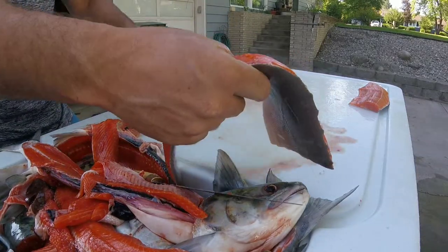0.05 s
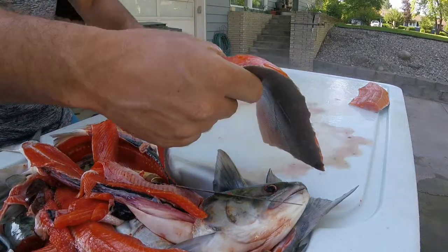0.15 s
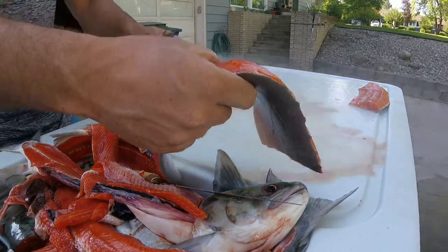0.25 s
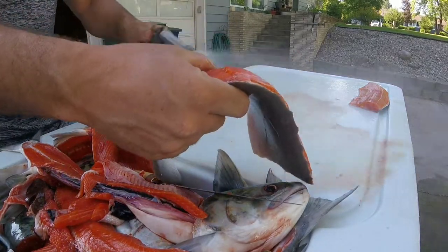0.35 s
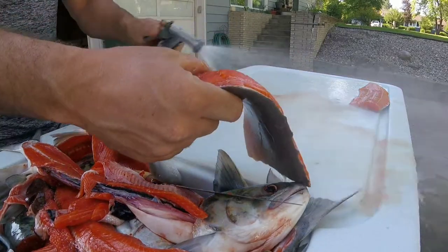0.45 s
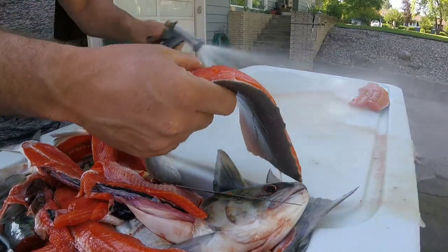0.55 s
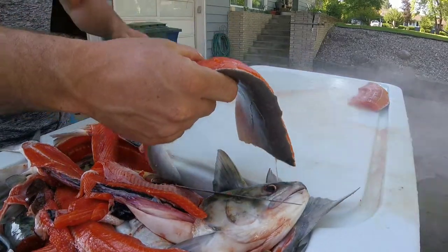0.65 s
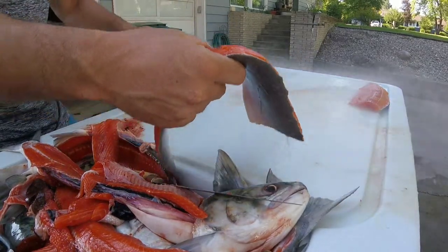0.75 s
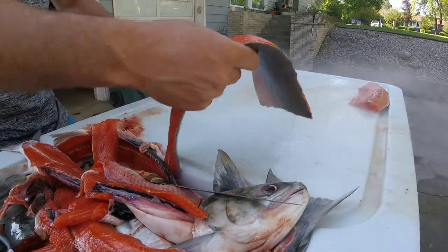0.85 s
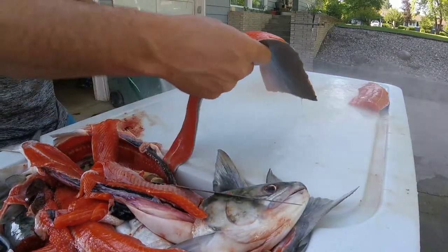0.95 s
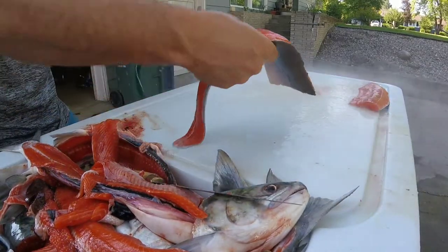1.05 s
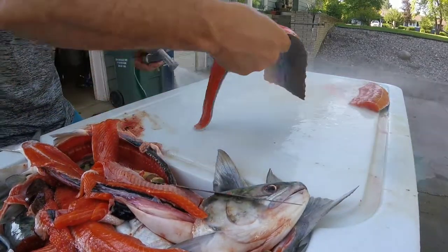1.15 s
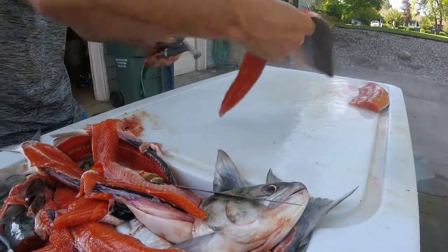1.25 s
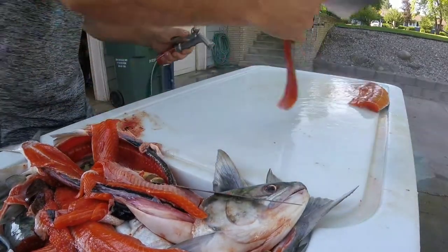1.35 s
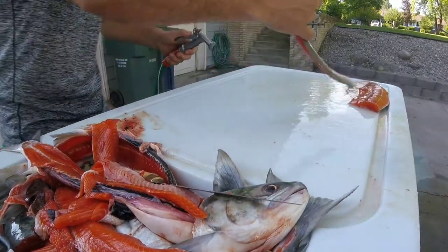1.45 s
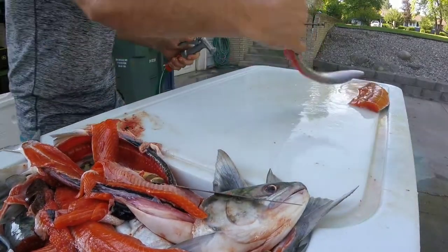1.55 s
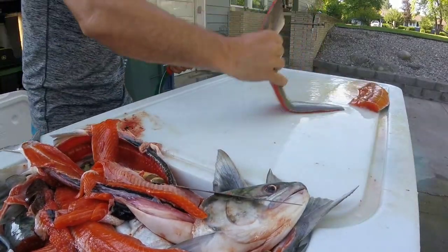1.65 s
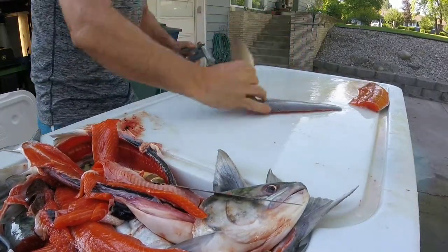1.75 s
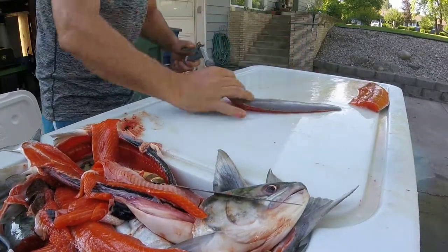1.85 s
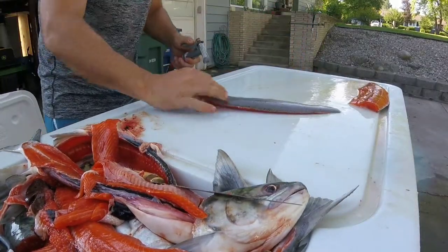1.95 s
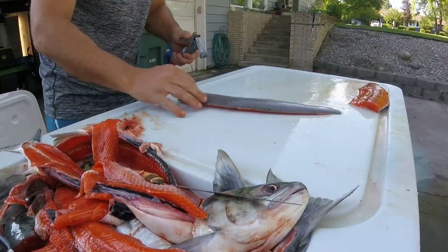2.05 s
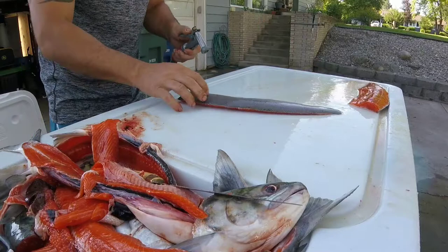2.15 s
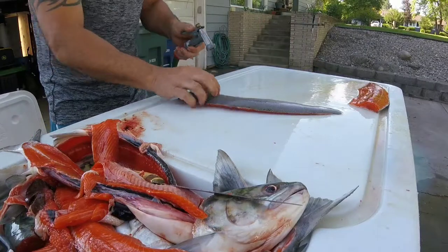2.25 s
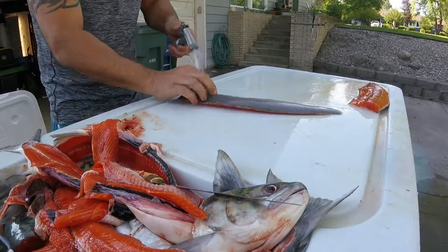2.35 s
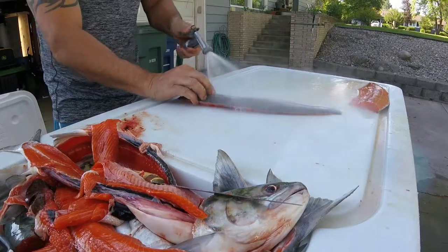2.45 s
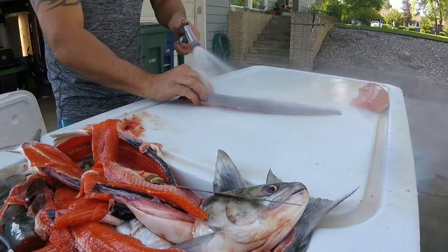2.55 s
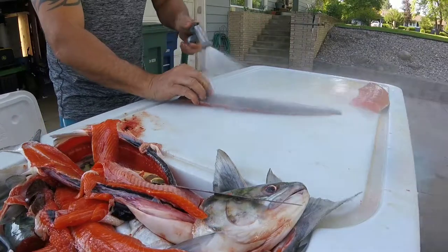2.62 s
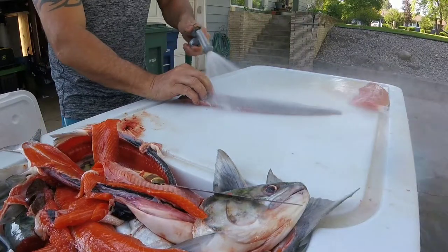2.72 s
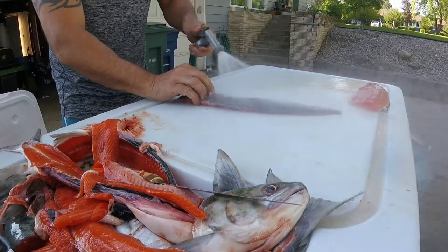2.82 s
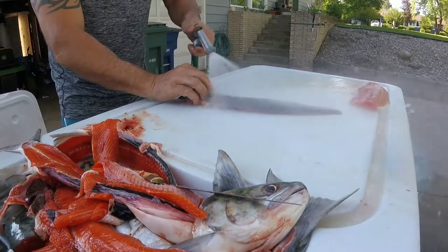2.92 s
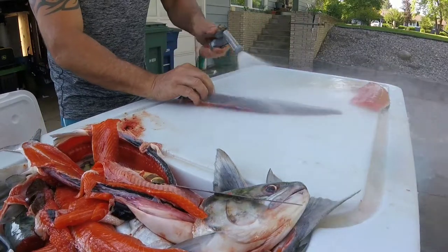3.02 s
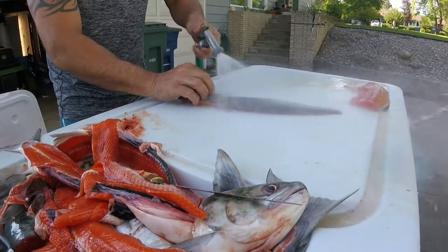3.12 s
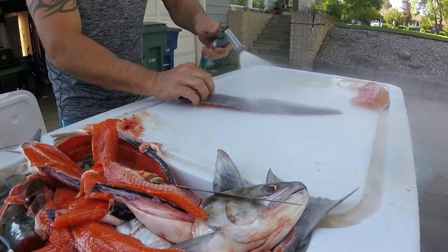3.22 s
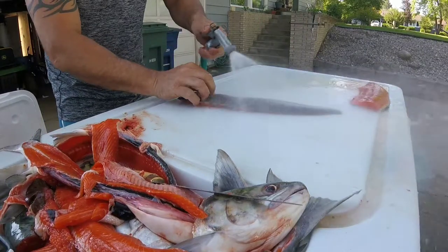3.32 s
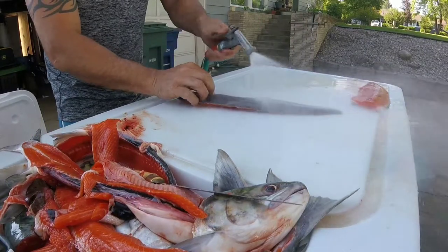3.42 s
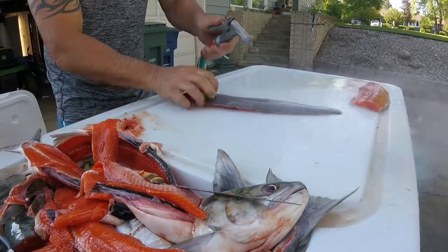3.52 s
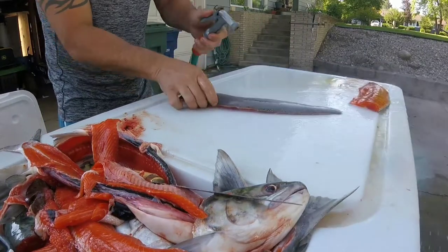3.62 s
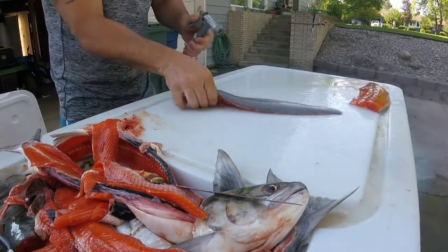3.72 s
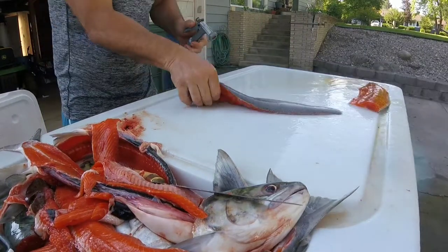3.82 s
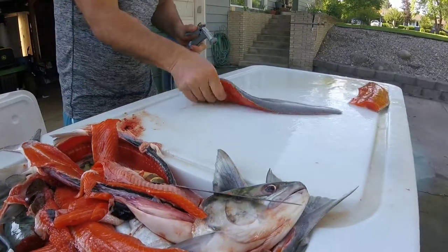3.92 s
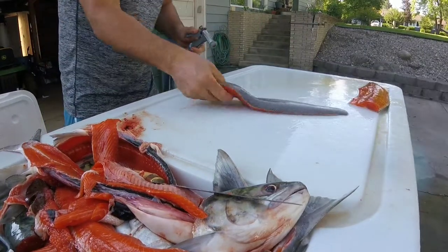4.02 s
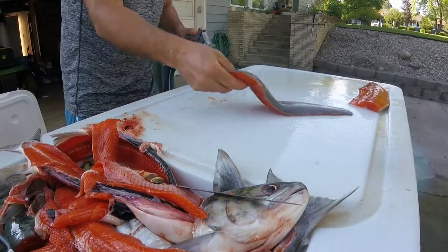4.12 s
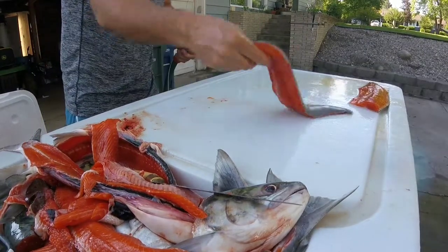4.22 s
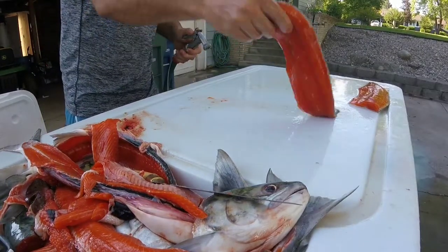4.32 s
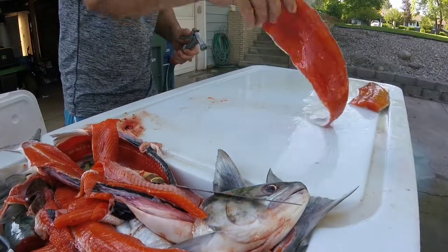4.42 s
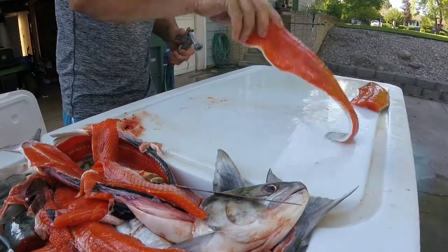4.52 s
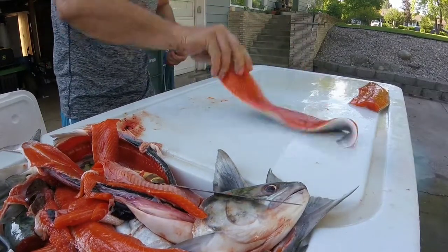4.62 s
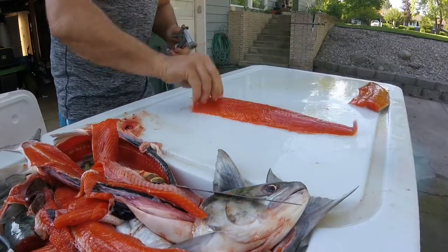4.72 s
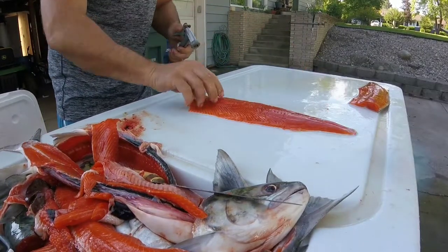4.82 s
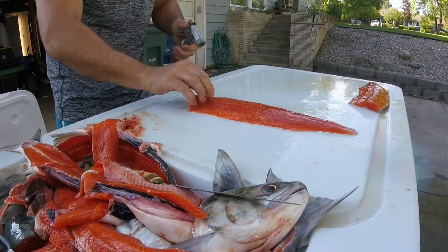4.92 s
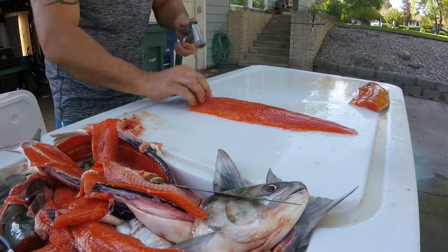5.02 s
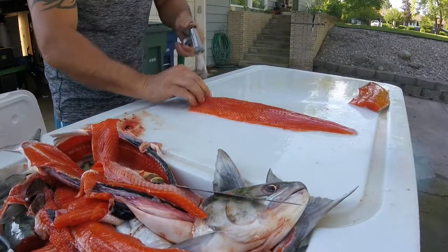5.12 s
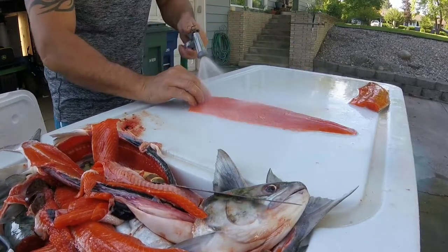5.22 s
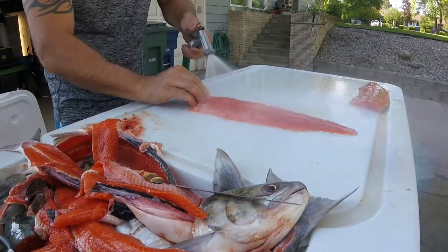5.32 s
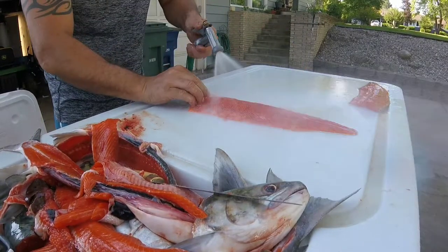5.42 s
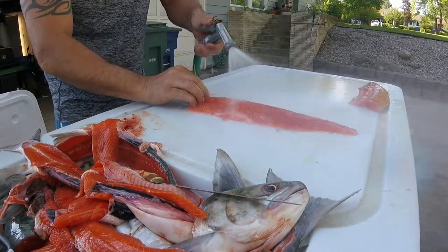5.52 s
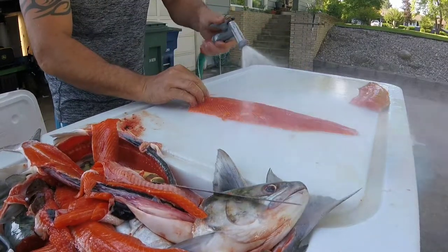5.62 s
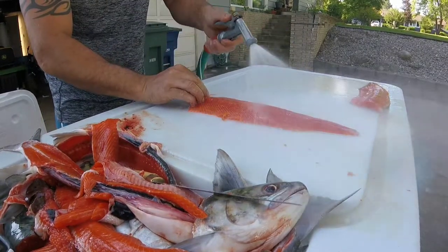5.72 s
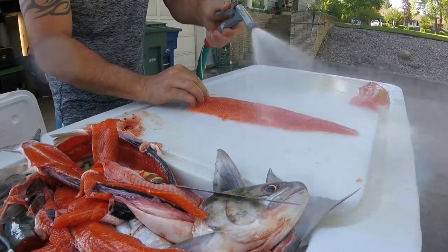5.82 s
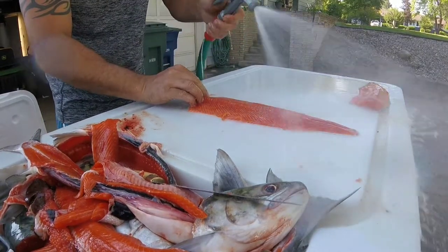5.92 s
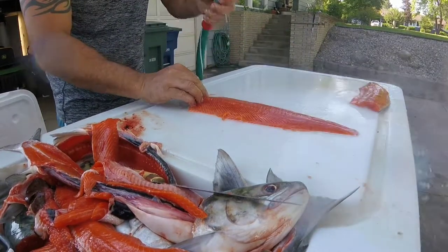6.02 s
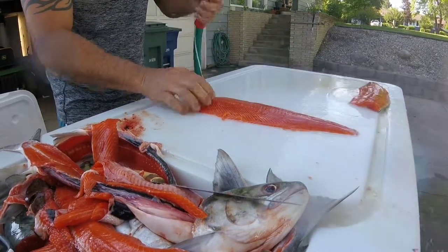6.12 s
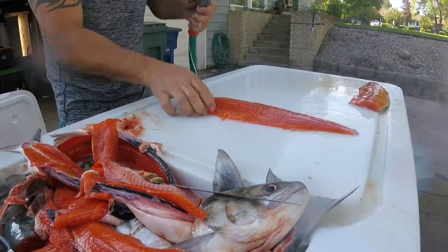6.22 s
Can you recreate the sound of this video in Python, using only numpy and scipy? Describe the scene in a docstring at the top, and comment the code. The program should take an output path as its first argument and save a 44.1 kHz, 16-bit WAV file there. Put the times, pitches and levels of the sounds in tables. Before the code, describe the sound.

Close outdoor water spray hisses and patters on hollow plastic in three bursts, broken by fillet slaps, soft bumps and dripping.

```python
"""Outdoors at a plastic table: a hose nozzle sprays three bursts over a fillet, heard close by.
A burst is noise split into five layers, from table drumming to mist, each with its own onset and stop.
Drips are short rising tones with noise fizz; slaps and hand bumps ring decaying table modes.
Runoff is dense small droplets; under it all lies steady bass-heavy noise, partly the microphone's own."""
import sys
import numpy as np
from scipy import signal
from scipy.fft import rfft, irfft
from scipy.io import wavfile
from scipy.ndimage import uniform_filter1d

SR = 44100
rng = np.random.default_rng(int(sys.argv[2]) if len(sys.argv) > 2 else 0)


def persist_wave(psi):
    """Save psi, clipped to +-1, as 16-bit WAV."""
    counts = np.round(np.clip(psi, -1, 1) * 32767).astype(np.int16)
    wavfile.write(sys.argv[1], SR, np.atleast_2d(counts).T)


N = 276066

# trigger squeezes: [valve opens/s, time to full flow/s, valve shuts/s, time to close/s,
# patter over its neighbours/dB]
BURSTS = [(-.4, .1, 1.2, .05, -3), (2.345, 0.14, 3.5, 0.057, -4), (5.135, 0.075, 5.955, 0.064, -3)]
# jet sweep, one curve a burst: [t/s, table drumming/dB, lower hiss/dB, upper hiss/dB, mist/dB]
SWEEPS = [
    [(0, -31, -29.5, -27, -35.5), (.07, -36, -41, -33.5, -35), (.16, -32.5, -31.5, -38, -33.5),
     (.25, -31.5, -32.5, -33, -33), (.34, -30, -31.5, -40.5, -34.5), (.52, -29, -26, -39, -34),
     (.6, -29, -27, -30, -28), (.67, -26.5, -26, -20, -26), (.79, -27, -33.5, -29.5, -34),
     (.93, -27, -32.5, -27.5, -28), (1.06, -26, -33, -30, -35.5), (1.19, -29, -33.5, -31, -34.5)],
    [(2.52, -26, -26, -22, -26), (2.7, -27, -28, -24.5, -26), (2.88, -26.5, -27, -25, -26.5),
     (2.98, -27, -28.5, -23.5, -28), (3.08, -25.5, -27.5, -25, -27.5), (3.24, -28, -26, -25, -27.5),
     (3.42, -28, -27, -26.5, -33), (3.5, -30.5, -29.5, -29.5, -30)],
    [(5.27, -29.5, -31, -27.5, -28), (5.37, -30.5, -30, -25, -25.5), (5.46, -31, -28, -26, -26.5),
     (5.55, -29.5, -29, -32.5, -28), (5.64, -31, -27, -37.5, -26.5), (5.75, -29.5, -21.5, -30, -23),
     (5.82, -28.5, -21.5, -29, -24), (5.9, -28, -24, -25, -23), (5.95, -32, -27.5, -32.5, -29.5)],
]
# table top under the jet: [f/Hz, density/dB per Hz]
DRUM_SPECTRUM = [(110, -16.5), (163, 1.5), (210, -6.5), (260, 3), (310, -0.5), (400, -2.5), (484, 0.5),
                 (550, -2.5), (663, 0), (870, 0), (1100, -2), (1465, -6.5), (1650, -5), (2300, -6.5)]
# droplets, with the peaks of the camera housing: [f/Hz, density/dB per Hz]
HISS_SPECTRUM = [(3200, -8), (3750, 4), (4050, 5.5), (4450, -3), (5600, 14), (6200, 17.5), (6550, 10),
                 (7000, -0.5), (7450, 5), (10000, 3), (11000, 8.5), (12000, -2), (13000, -1),
                 (15300, -23.5)]
# local dips (one is a lift) in the hiss: [centre t/s, centre f/Hz, width/Hz, length/s, change/dB]
HISS_DIPS = [(.35, 4777, 400, 0.61, -5), (2.718, 7900, 600, .03, -17), (2.89, 7760, 600, 0.025, -10),
             (3.064, 7600, 600, 0.029, -22), (3.406, 9500, 500, .08, 4), (5.584, 9600, 500, 0.059, -13)]
# crossovers between drumming, patter, lower hiss, upper hiss and mist: [f/Hz]
LAYER_EDGES_HZ = [1400, 3200, 4700, 6900]
# delay from valve to sound, drumming to mist; the nozzle hisses before water lands: [delay/s]
ARRIVE_S = [0.032, 0.022, 0.011, 0.0051, 0.0013]
# delay from valve shutting to decay, drumming to mist: [delay/s]
LINGER_S = [.03, 0.023, 0.0092, 0.0041, 0.0048]
# exponent of the opening ramp, drumming to mist: [power]
RISE_POWER = [0.99, 0.91, 3.2, 4.1, 3.1]
# first spit as a share of full level, drumming to mist: [share]
SPIT_SHARE = [.05, .08, .25, .3, .35]
# drips and wet clicks: [t/s, level/dB, nominal pitch f/Hz, ground echo/dB, fizz/dB,
# fizz treble density/dB per Hz]
DRIPS = [(1.3269, -43, 2791, 0, -2.5, -21), (1.351, -40, 3620, -4, 3, -20),
         (1.4053, -33, 4300, -8, -1, -28), (1.4641, -42, 3760, -5, -2.5, -18),
         (1.5753, -38.5, 4390, -7, 1, -21), (1.6395, -44, 3500, 0, -7, -23),
         (1.7054, -39, 3740, -8, 3, -27), (1.945, -42, 3230, -5, -2.5, -20),
         (2.0068, -48, 3870, -6, -2.5, -22), (2.03, -36, 3630, 0, -15, -26),
         (2.0717, -42, 3800, -3, -6, -23), (2.3111, -46, 4400, -6, 0, -18),
         (3.5843, -35, 3500, -3, -12, -26), (3.6205, -36.5, 3280, -3, -1, -28),
         (3.6467, -35, 3300, -1, -10, -6), (3.681, -35.5, 6100, -5, 5.5, -9),
         (3.717, -36, 3550, 0, -2.5, -21), (3.7414, -39, 3660, -3, 4, -20),
         (3.7688, -38, 3910, -3, -1, -21), (3.8074, -46, 4100, -3, 0, -15),
         (3.8185, -21.5, 3700, -4, -5, -29), (3.854, -22, 2700, -1, -8, -37),
         (3.8634, -29, 4180, -12, -4, -28), (3.895, -29, 3360, 0, 0, -28), (3.9414, -33, 4870, -5, -1, -23),
         (3.9557, -32, 4200, -3, -4, -28), (3.9942, -36, 4090, -1, 2, -24),
         (4.027, -31.5, 3750, -1, 2, -28), (4.063, -35, 3650, -5, 2, -22),
         (4.1026, -34, 6170, -4.5, -5, -10), (4.1603, -23.5, 3080, -2, -9, -28),
         (4.1937, -30.5, 5450, -7, 3.5, -26), (4.2594, -40, 4660, -3, -2.5, -19),
         (4.3604, -46, 6000, -3, 5, -10), (4.5284, -40.5, 3950, -1, -3, -21), (4.604, -44, 4820, 1, 0, -11),
         (4.673, -39.5, 2220, -3, 8, -14), (4.6994, -46, 4110, -1, 2, -16),
         (4.7525, -33, 6100, -11, 5.5, -18), (6.0444, -44, 2830, -3, -2.5, -20),
         (6.101, -38.5, 2977, 0, 3, -31), (6.1449, -38, 7560, -2, -5, -2), (6.1834, -46, 2850, -6, -4, -25),
         (6.1946, -27.5, 3230, 1.5, -5.5, -30)]
# lower part of a drip's fizz: [f/Hz, density/dB per Hz]
FIZZ_SPECTRUM = [(1600, -46), (2600, -12.5), (4000, -12), (6300, -12)]
# fillet slaps and hand bumps: [t/s, thump peak/dB, wet crack peak/dB, push/ms, thump tilt/dB per octave]
BLOWS = [(0.358, -13.5, -16, 3.4, -5), (1.66, -12, -16.5, 2.5, -1.5), (1.688, -24, -46, 1.7, -2.5),
         (1.727, -38, -33, 2.8, 5), (2.009, -28, -42, 0.93, 0), (2.021, -27.5, -37, 5.2, 0.5),
         (2.042, -29, -54, 2.6, 3), (2.103, -42, -36, 2.5, 15), (2.251, -31.5, -54, 2, 0),
         (2.265, -35, -57, 2.5, 0), (4.648, -15, -15, 1.5, -0.5), (4.677, -34, -38, 2.4, -6),
         (4.743, -22.5, -42, 2.3, -14), (4.759, -24, -52, 2.2, -8), (4.799, -28.5, -54, 1.9, -5),
         (6.163, -25.5, -49, 1.7, -6), (6.185, -22.5, -49, 4.2, -4.5), (6.215, -29, -52, 2, 4),
         (6.239, -28, -52, 1.5, -3)]
# modes of the table top: [f/Hz, level/dB, t60/s]
TABLE_MODES = [(152, -1, 0.071), (198, -2.5, 0.07), (259, -1.5, 0.099), (339, -3, 0.08), (470, -6.5, 0.052),
               (643, 3, 0.018), (830, -4, 0.031), (970, -10, 0.028), (1400, -21, 0.018), (1870, -16, 0.022)]
# crack of wet skin: [f/Hz, density/dB per Hz]
CRACK_SPECTRUM = [(800, -4), (1900, -2.5), (2900, -10), (3900, 0.5), (4700, -14), (6200, -6), (7500, -27),
                  (10500, -16), (12500, -23), (15000, -38)]
# water running off and wet skin sliding on plastic, one curve a stretch: [t/s, level/dB]
RUNOFF = [
    [(1.27, -61.5), (1.37, -65), (1.478, -81), (1.99, -76), (2.03, -54), (2.055, -66), (2.11, -55),
     (2.14, -70), (2.31, -66), (2.36, -52)],
    [(3.57, -62), (3.628, -60), (4.022, -54), (4.23, -61), (4.34, -67), (4.8, -81)],
    [(6.04, -61), (6.26, -59)],
]
# colour of the runoff: [f/Hz, density/dB per Hz]
WET_SPECTRUM = [(800, -23), (2000, -1.5), (3500, 4), (5000, 2), (6300, -0.5), (8000, -10), (11000, -7),
                (15000, -43)]
# background noise, partly the microphone's own: [f/Hz, density/dB per Hz]
BACKGROUND_SPECTRUM = [(20, -19.5), (105, -23.5), (128, -5), (165, 5.5), (260, 1), (400, -6), (800, -9.5),
                       (1400, -17.5), (2200, -22.5), (4000, -24.5), (4600, -33), (5700, -35), (6300, -26),
                       (15300, -40)]
# slow level changes of the background: [t/s, level/dB]
BACKGROUND_LEVEL = [(0, -40), (1.3, -43.5), (1.851, -44), (2.3, -43.5), (3.6, -40.5), (4, -42.5),
                    (4.45, -44), (5.1, -43.5), (6.05, -43.5), (6.26, -41.5)]

SPIT_S = 0.034  # rise of the valve's first spit, before the flow builds
LEAK_S, LEAK_DB = .025, -30.5  # the nozzle seeps just before it spits
PATTER_FROM_HISS = 0.23  # patter's place between drumming (0) and lower hiss (1)
WEAK_JET_LAG = 0.16  # share of the opening time that a still weak jet adds to its way to the table
FALL_POWER = 2.23
DRIP_CYCLES = 1.8
ECHO_S = .0045  # extra path by way of the ground
CRACK_MS = 1.09
# faint stray drips after each burst
STRAY_COUNT, STRAY_WAIT_S, STRAY_HZ = 5, .5, (2100, 5000)
STRAY_DB, STRAY_SPREAD_DB, STRAY_ECHO_DB = -50, 4, -3
STRAY_FIZZ_DB, STRAY_TREBLE_DB = -4, -15
YARD_DB = -16.0
EDGE_HZ = 15400


def gain_of(db):
    """Decibels to amplitude."""
    return 10 ** (np.asarray(db) / 20)


def evened(x):
    """Scales to rms 1."""
    return x / np.sqrt(np.mean(np.abs(x) ** 2) + 1e-20)


def read(points, hz):
    """Reads a spectrum on a log-frequency axis."""
    f, value = np.transpose(points)
    return np.interp(np.log(hz + 1), np.log(f + 1), value)


def add(mix, start_s, sound):
    """Mixes a sound in at start_s."""
    part = mix[round(start_s * SR):][:len(sound)]
    part += sound[:len(part)]


def colour(x, db_of_hz):
    """Filters x by a spectrum."""
    hz = np.fft.rfftfreq(len(x), 1 / SR)
    return irfft(rfft(x) * gain_of(db_of_hz(hz)), len(x))


def to_patches(x):
    """Short-time spectrum: frequencies/Hz, times/s, values."""
    return signal.stft(x, SR, nperseg=256, noverlap=192)


def from_patches(z, count):
    """Short-time spectrum back to count samples."""
    return signal.istft(z, nperseg=256, noverlap=192)[1][:count]


def mottle(x, patchy_db, bins, frames, treble=0.):
    """Lays random louder and softer patches over time and frequency, deeper in the treble if asked."""
    hz, _, z = to_patches(x)
    field = rng.standard_normal(z.shape[::-1]).T
    for _ in range(2):
        field = uniform_filter1d(field, bins, 0)
        field = uniform_filter1d(field, frames, 1)
    depth_db = patchy_db * (1 + treble * np.minimum(hz / 8000, 1) ** 2)[:, None]
    return from_patches(z * gain_of(depth_db * evened(field)), len(x))


def droplets(count, spread_db, per_s, share):
    """Dense impacts of uneven size over a bed of fine mist."""
    size = gain_of(spread_db * np.minimum(rng.exponential(1, count), 3))
    hits = size * (rng.random(count) < per_s / SR)
    sign_noise, mist = rng.standard_normal((2, count))
    return share * evened(hits * np.sign(sign_noise)) + mist


def dip_patches(x, start_s):
    """Changes the level of the listed patches of the hiss."""
    hz, t, z = to_patches(x)
    db = 0
    for centre_s, centre_hz, width_hz, length_s, change_db in HISS_DIPS:
        off_hz = (hz[:, None] - centre_hz) / width_hz
        off_s = (t + start_s - centre_s) / length_s
        db = db + change_db * np.exp(-off_hz ** 2 - off_s ** 2)
    return from_patches(z * gain_of(db), len(x))


def band_db(hz, low_hz, high_hz):
    """Steep band-pass that isolates one layer."""
    return -10 * np.log10((1 + (low_hz / (hz + 1)) ** 40) * (1 + (hz / high_hz) ** 40))


def valve(k, t, opens_s, rise_s, shuts_s, close_s):
    """Flow of layer k: seep, spit, build-up, then shut-off; drumming and patter wait for a weak jet."""
    since = t - opens_s - ARRIVE_S[k] - WEAK_JET_LAG * rise_s * (k < 2)
    spit = SPIT_SHARE[k] * np.sin(np.pi / 2 * np.clip(since / SPIT_S, 0, 1)) ** 2
    leak = gain_of(LEAK_DB) * np.clip(1 + since / LEAK_S, 0, 1) * (k > 2)
    build = (1 - SPIT_SHARE[k]) * np.clip(since / rise_s, 0, 1) ** RISE_POWER[k]
    left = np.clip(1 - (t - shuts_s - LINGER_S[k]) / close_s, 0, 1) ** FALL_POWER
    return (leak + spit + build) * left


def burst(opens_s, rise_s, shuts_s, close_s, over_db, sweep):
    """The jet drums the table and breaks into droplets; its aim shifts the balance of the layers."""
    sweep_s, drum_db, lower_db, upper_db, mist_db = np.transpose(sweep)
    patter_db = over_db + drum_db + PATTER_FROM_HISS * (lower_db - drum_db)
    t = np.arange(max(opens_s - LEAK_S, 0), shuts_s + max(LINGER_S) + close_s, 1 / SR)
    water = droplets(len(t), 3.05, 6000, share=0.56)
    water = colour(water, lambda hz: read(DRUM_SPECTRUM + HISS_SPECTRUM, hz))
    # random louder and softer patches in the spray, deeper in the treble
    water = mottle(water, 0.97, bins=4, frames=34, treble=1.72)
    water = mottle(water, 0.33, bins=30, frames=3, treble=2.7)
    water = dip_patches(water, t[0])
    edges_hz = [20] + list(LAYER_EDGES_HZ) + [SR]
    out = np.zeros(len(t))
    for k, db in enumerate([drum_db, patter_db, lower_db, upper_db, mist_db]):
        layer = colour(water, lambda hz: band_db(hz, edges_hz[k], edges_hz[k + 1]))
        level = gain_of(np.interp(t, sweep_s, db))
        out += evened(layer) * level * valve(k, t, opens_s, rise_s, shuts_s, close_s)
    return t[0], out


def blow(thump_db, crack_db, push_ms, tilt_db, noise):
    """An uneven push rings the table top; wet skin adds a crack and a spatter."""
    t = np.arange(len(noise)) / SR
    ring = 0
    for hz, db, t60_s in TABLE_MODES:
        decay_db = db + tilt_db * np.log2(hz / 300) - 60 * t / t60_s
        ring = ring + gain_of(decay_db) * np.sin(2 * np.pi * hz * t)
    u = t * 1000 / max(push_ms, .3)
    v = t * 1000 / CRACK_MS
    push = noise[::-1] * (u * np.exp(-u) + 0.27 * np.exp(-t / 0.025))
    thump = signal.fftconvolve(ring, push)[:len(t)]
    crack = colour(noise, lambda hz: read(CRACK_SPECTRUM, hz))
    crack *= v * np.exp(1 - v) + 0.079 * np.exp(-t / 0.011)  # crack, then spatter
    return gain_of(thump_db) * thump / abs(thump).max() + gain_of(crack_db) * crack / abs(crack).max()


def drip(db, hz, echo_db, fizz_db, treble_db, noise):
    """A few rising cycles with a fizz of fine spray, then again off the ground."""
    t = np.arange(len(noise)) / SR
    life_s = DRIP_CYCLES / hz
    treble = [(8500, treble_db), (11500, treble_db), (15000, treble_db - 18)]
    fizz = evened(colour(noise, lambda f: read(FIZZ_SPECTRUM + treble, f)))
    fizz *= t / 0.00069 * np.exp(-t / 0.00039) + 0.2 * np.exp(-t / 0.0051)
    ping = 5 * t / life_s * np.exp(-2 * t / life_s) * np.sin(2 * np.pi * hz * t * (0.957 + 60 * t))
    direct = ping + gain_of(fizz_db) * fizz
    echo = np.pad(direct, (round(ECHO_S * SR), 0))[:len(t)]
    return gain_of(db) * (direct + gain_of(echo_db) * echo)


def strays():
    """Rows of faint drips at random moments, thinning out after each burst."""
    rows = []
    for _, _, shuts_s, close_s, _ in BURSTS:
        for wait, size, pitch in rng.random((STRAY_COUNT, 3)):
            s = shuts_s + close_s - STRAY_WAIT_S * np.log(1 - wait)
            db = STRAY_DB + STRAY_SPREAD_DB * (2 * size - 1)
            hz = np.interp(pitch, (0, 1), STRAY_HZ)
            rows.append((s, db, hz, STRAY_ECHO_DB, STRAY_FIZZ_DB, STRAY_TREBLE_DB))
    return rows


def runoff(rows):
    """Water running off and wet skin sliding: small uneven droplets and squelches."""
    s, db = np.transpose(rows)
    t = np.arange(s[0], s[-1], 1 / SR)
    wet = colour(droplets(len(t), 4.5, 1200, share=.9), lambda hz: read(WET_SPECTRUM, hz))
    wet = mottle(wet, 2.5, bins=10, frames=5)
    return s[0], evened(wet) * gain_of(np.interp(t, s, db)) * signal.windows.tukey(len(t), .05)


def yard(x):
    """Sparse late reflections off walls and paving."""
    t = np.arange(round(.25 * SR)) / SR
    sparse = (rng.random(len(t)) < .1) * (t > .008)
    taps = rng.standard_normal(len(t)) * sparse * gain_of(-60 * t / 0.2)
    return signal.oaconvolve(x, taps / np.linalg.norm(taps))[:N]


def background():
    """Steady bass-heavy background noise, partly the microphone's own, with slow level changes."""
    bed = colour(rng.standard_normal(N), lambda hz: read(BACKGROUND_SPECTRUM, hz))
    bed = mottle(bed, 0.93, bins=3, frames=31)
    s, db = np.transpose(BACKGROUND_LEVEL)
    return evened(bed) * gain_of(np.interp(np.arange(N) / SR, s, db))


def scene():
    """Bursts, blows, drips and runoff in the yard, over the background noise."""
    near = np.zeros(N)
    for row, sweep in zip(BURSTS, SWEEPS):
        add(near, *burst(*row, sweep))
    for s, *row in BLOWS:
        add(near, s, blow(*row, rng.standard_normal(6000)))
    for s, *row in DRIPS + strays():
        add(near, s, drip(*row, rng.standard_normal(1500)))
    for rows in RUNOFF:
        add(near, *runoff(rows))
    wind_filter = signal.cheby2(8, 45, 108, "high", fs=SR, output="sos")  # of the microphone
    near = signal.sosfilt(wind_filter, near)
    return (near + gain_of(YARD_DB) * yard(near) + background())[None]


def record(dry):
    """Linear-phase low-pass: the band limit."""
    lowpass = signal.firwin(511, EDGE_HZ, window=("kaiser", 9), fs=SR)
    return signal.oaconvolve(dry, lowpass[None], "same")


dry = scene()
out = record(dry)
persist_wave(out)
```